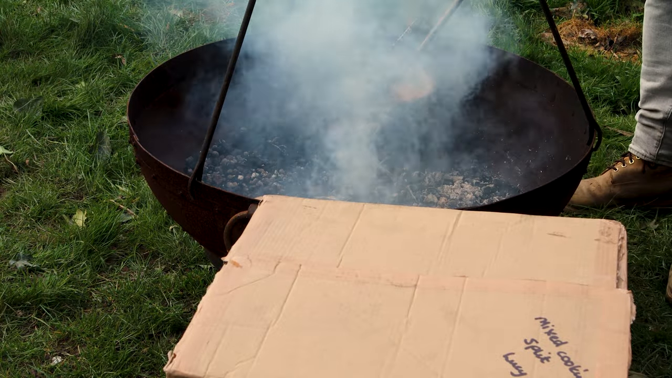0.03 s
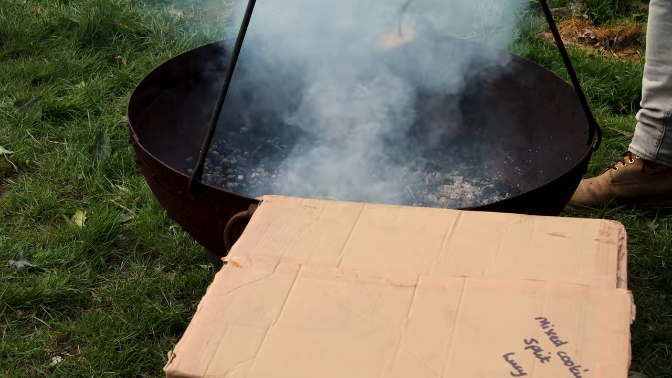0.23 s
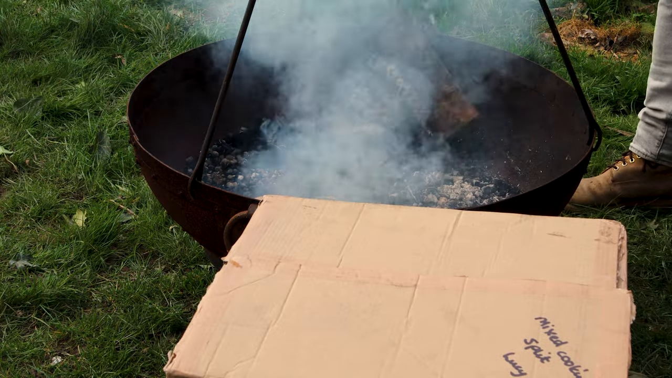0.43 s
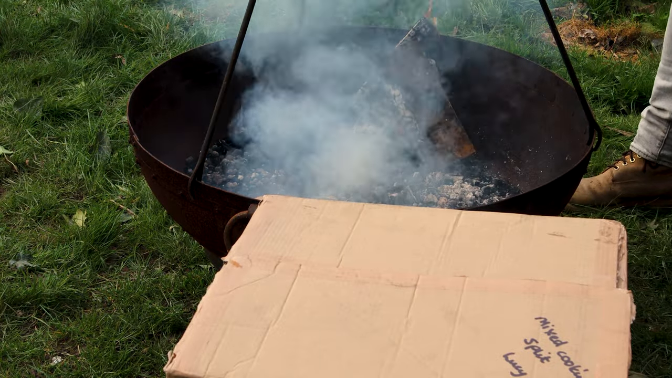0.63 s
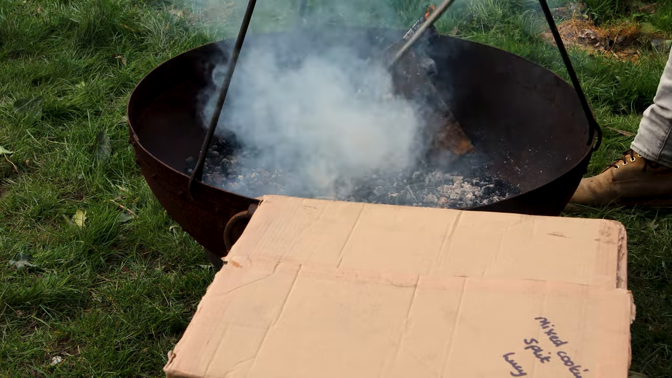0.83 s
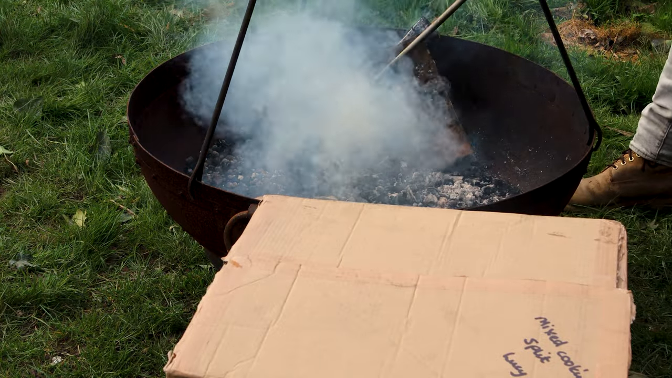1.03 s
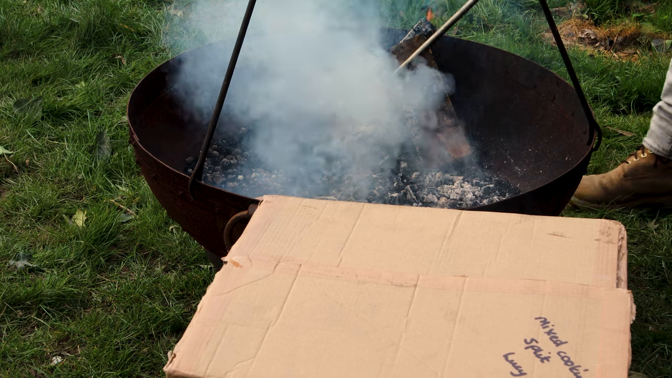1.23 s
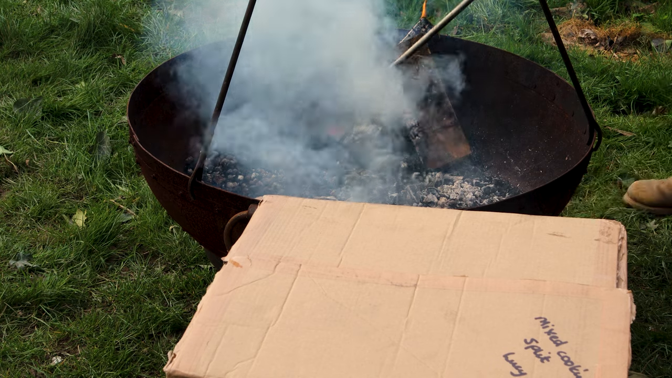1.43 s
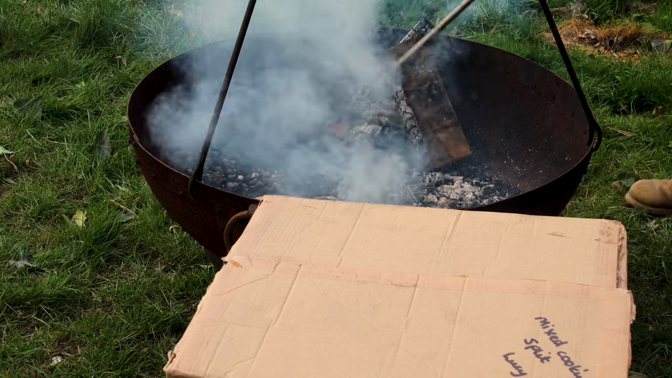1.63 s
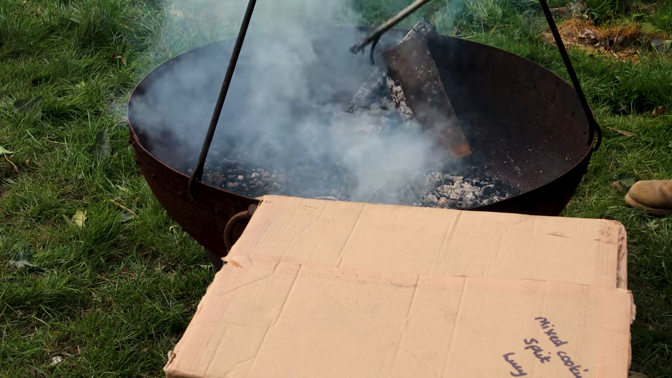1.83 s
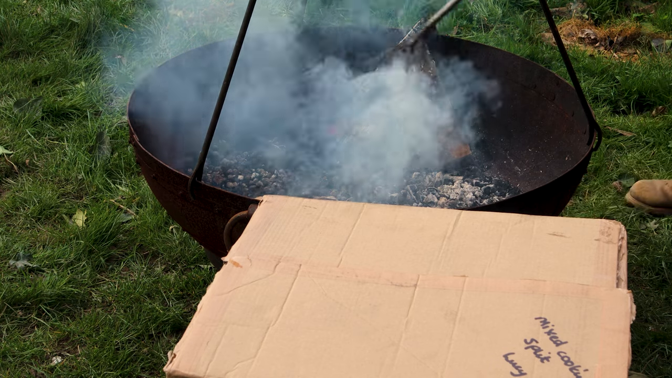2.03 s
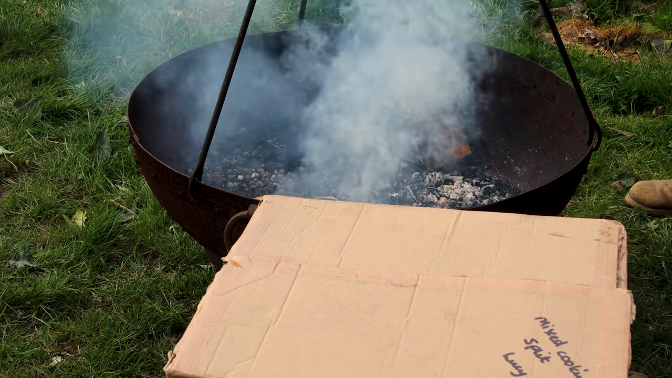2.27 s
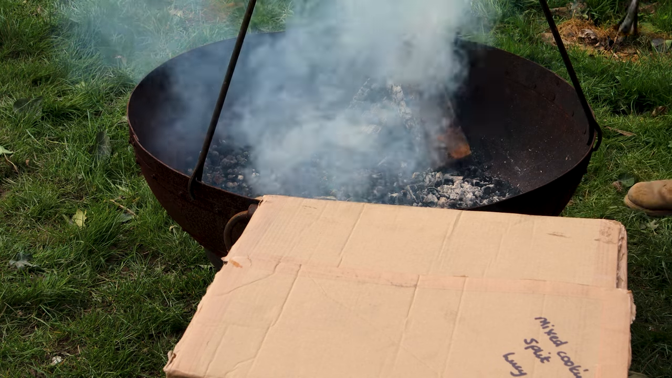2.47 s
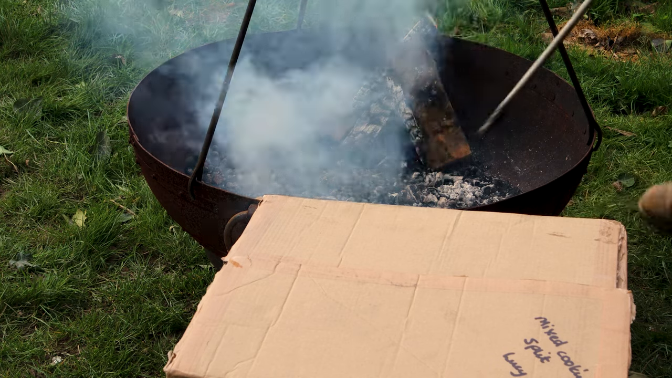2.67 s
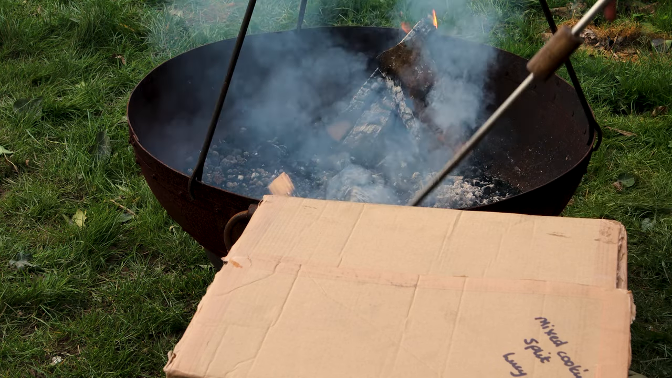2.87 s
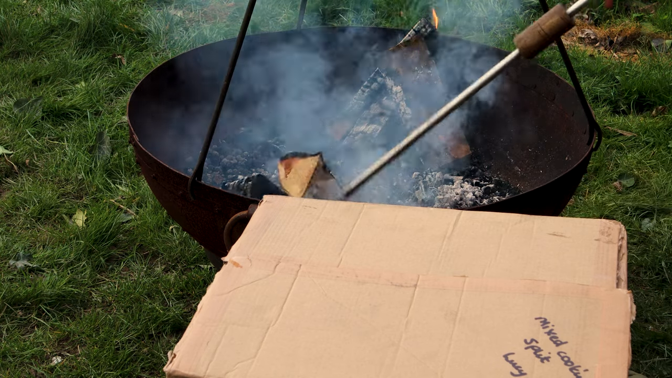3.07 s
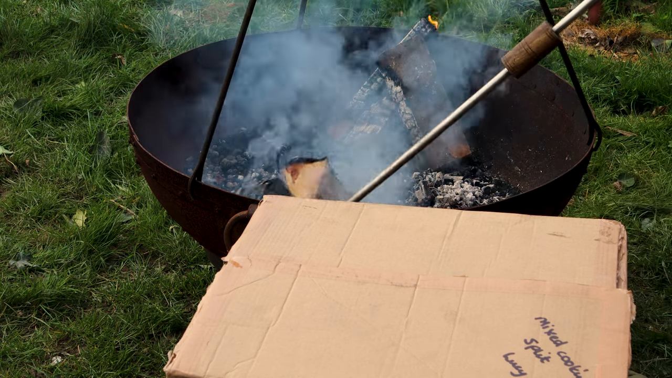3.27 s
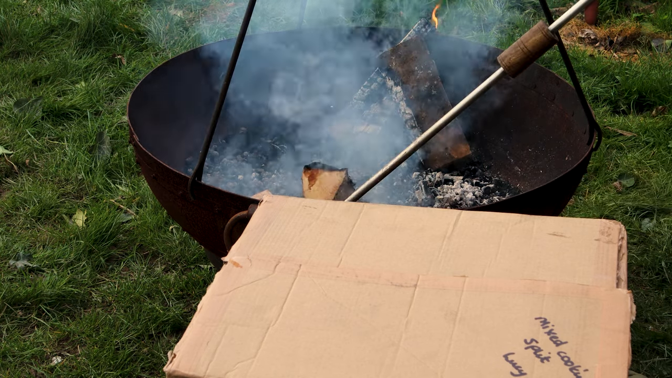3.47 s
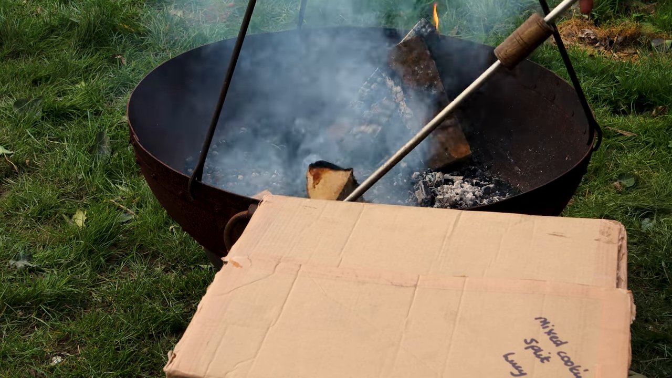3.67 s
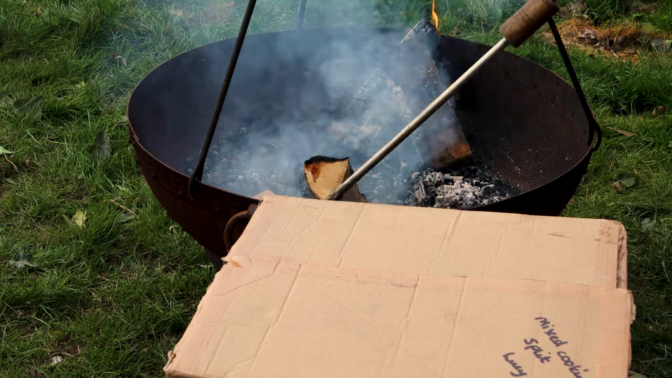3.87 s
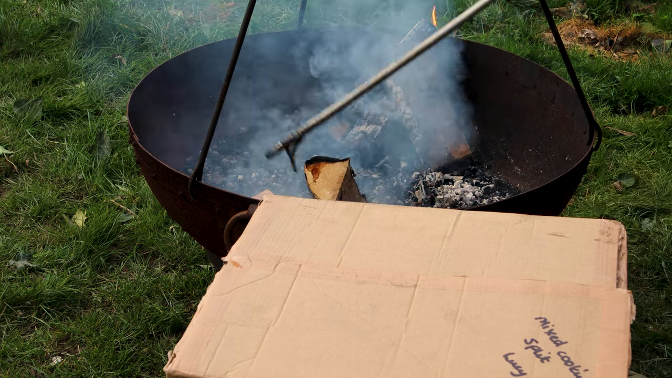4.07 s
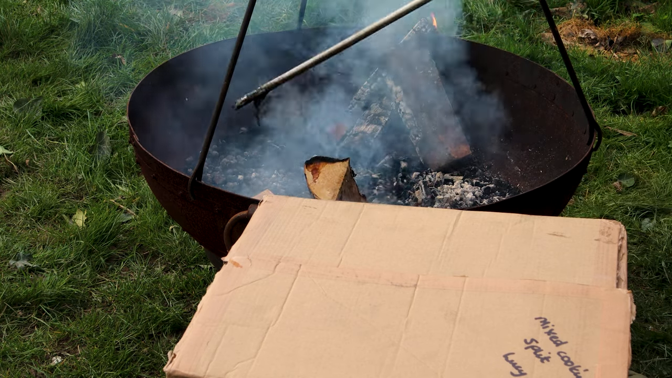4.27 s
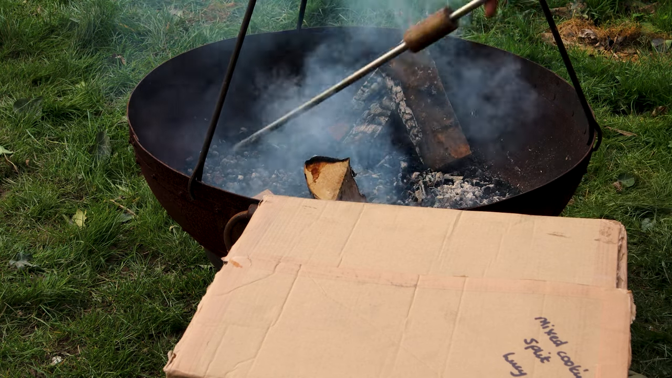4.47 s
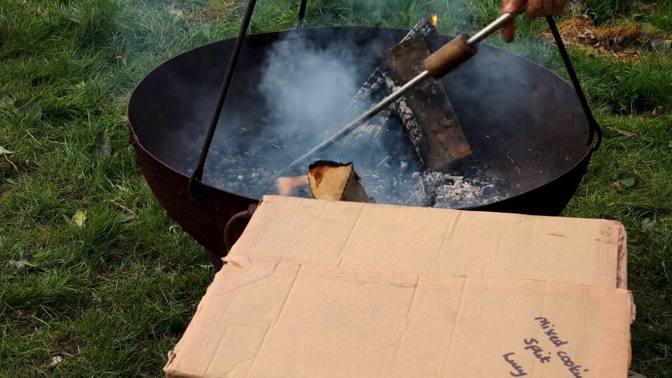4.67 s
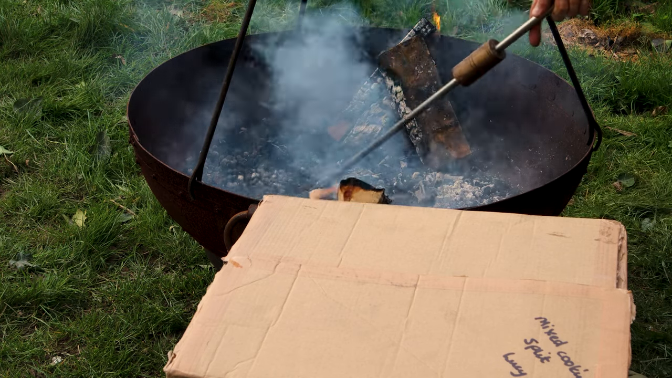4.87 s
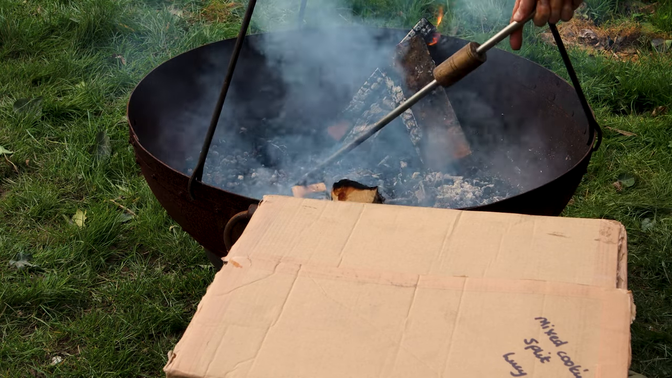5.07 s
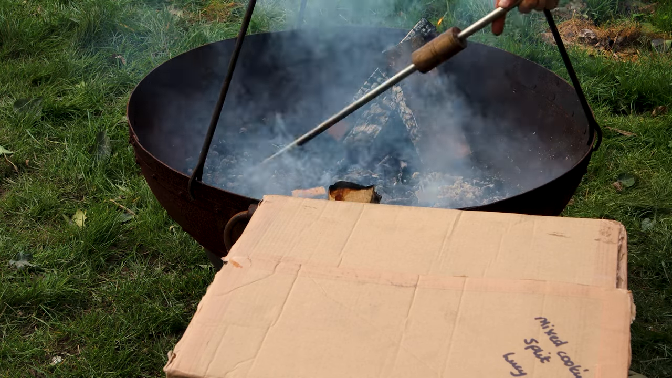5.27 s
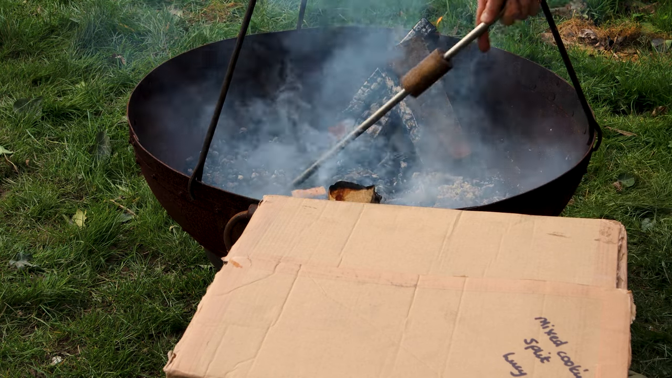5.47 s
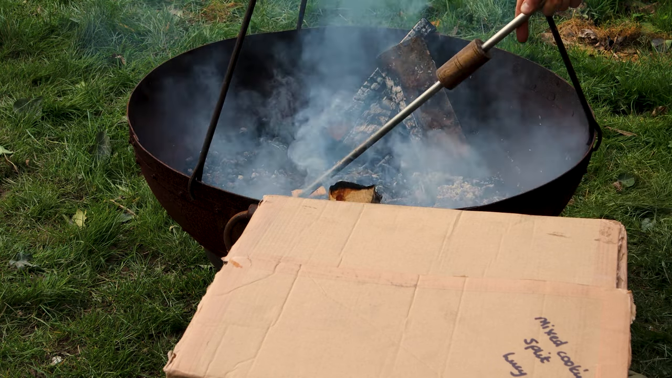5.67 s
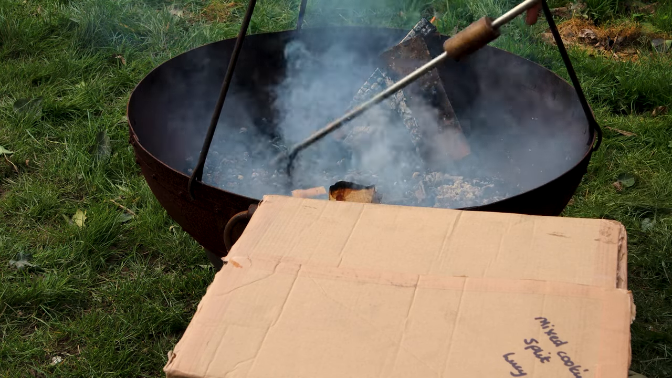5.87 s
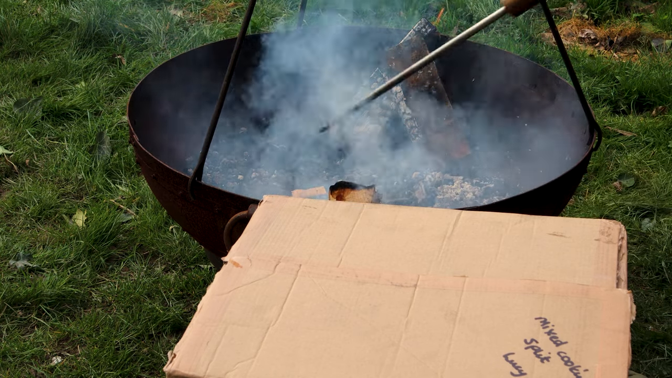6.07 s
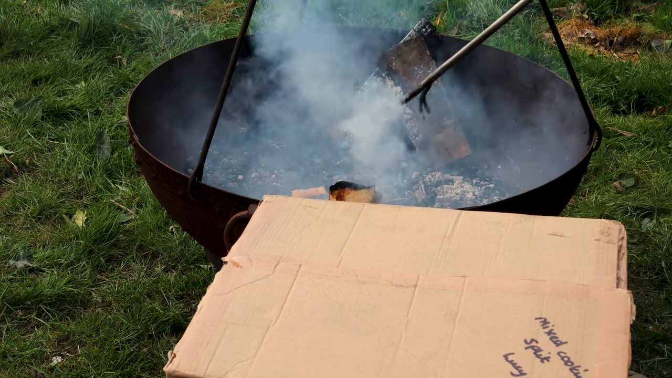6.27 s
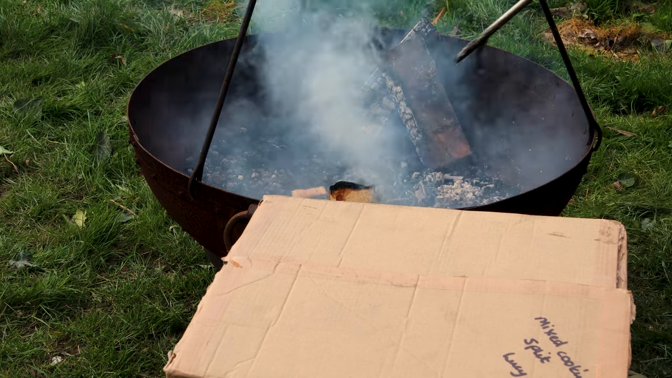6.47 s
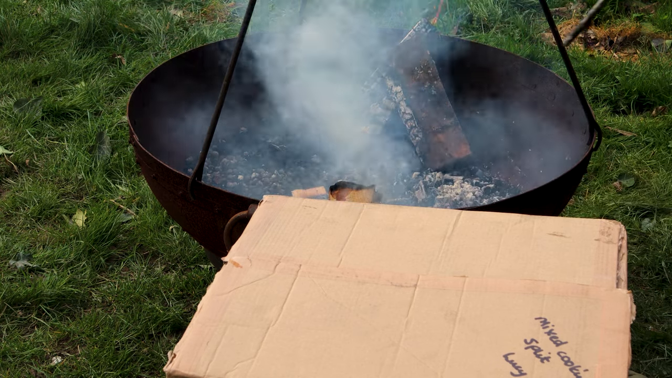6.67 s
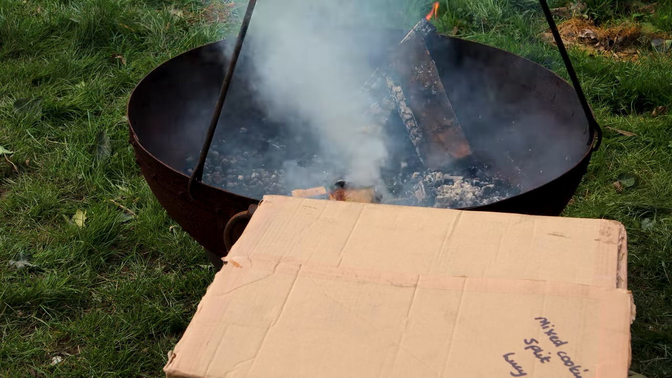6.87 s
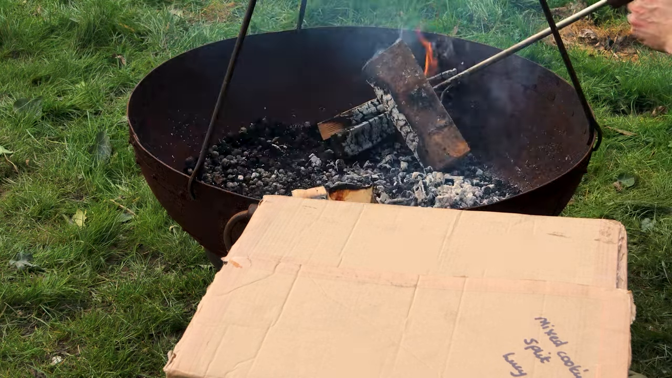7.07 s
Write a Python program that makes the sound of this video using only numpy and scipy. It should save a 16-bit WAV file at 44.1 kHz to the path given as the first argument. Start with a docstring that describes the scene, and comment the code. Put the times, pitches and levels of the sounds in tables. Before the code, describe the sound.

Iron tongs clink and knock logs in a metal fire bowl outdoors, one log crashing down hard, embers scraping, fire popping, a small bird singing.

```python
"""Close beside a cast fire bowl on a lawn; trees and hedges give short echoes and the garden rumbles softly.
Iron tongs clang and shift the logs at once; at half a second a log drops and overloads the microphone.
Logs then knock and drag through embers until about 5.7 s: each force excites the ash-damped bowl's modes.
From 2.9 to 4.7 s a small bird sings a gliding two-note phrase four times in the trees.
Gas pops, ticks and steam hiss run throughout; the bird chips briefly at 7 s."""
import sys
import numpy as np
from scipy import signal
from scipy.fft import rfft, irfft
from scipy.io import wavfile
from scipy.ndimage import uniform_filter1d

SR = 44100
rng = np.random.default_rng(int(sys.argv[2]) if len(sys.argv) > 2 else 0)


def to_wav(sig):
    """Store sig (one row per channel, or 1-D mono) as 16-bit WAV at the path in sys.argv[1].

    Samples outside -1..1 are clipped; the rate is SR.
    """
    pcm = np.clip(np.atleast_2d(sig), -1, 1) * 32767
    pcm = np.round(pcm).astype(np.int16)
    wavfile.write(sys.argv[1], SR, pcm.T)  # frames by channels


N = 313551
TIME = np.arange(N) / SR
AGE = TIME[:SR // 2]  # seconds since a short sound began
TOP_HZ = 15900  # the microphone's upper limit


def undb(db):
    """Decibels to gain."""
    return 10 ** (np.asarray(db) / 20)


def unit(x):
    """Scale to an rms of 1."""
    return x / np.sqrt(np.mean(x ** 2))


def peak(x, db):
    """Scale a short sound to this peak level."""
    return x * undb(db) / np.abs(x).max()


def burst(x, db, size=353):
    """Scale a short sound so that its loudest stretch of size samples has this rms level."""
    return x * undb(db) / np.sqrt(uniform_filter1d(x ** 2, size).max())


def add(out, start_s, x):
    """Mix x into out from start_s."""
    i = max(int(start_s * SR), 0)
    out[i:i + len(x)] += x[:len(out) - i]


def through(x, response):
    """Pass x through an impulse response."""
    return signal.fftconvolve(x, response)[:len(x)]


def colour(x, points, size=2048):
    """Causal minimum-phase filter with a (pitch_hz, level_db) spectrum."""
    hz, db = np.transpose(points)
    bins = np.maximum(np.fft.rfftfreq(size, 1 / SR), 1)
    gain = undb(np.interp(np.log(bins), np.log(hz), db))
    cepstrum = irfft(np.log(gain))
    # folding the cepstrum forward makes the filter causal
    cepstrum[1:size // 2] *= 2
    cepstrum[size // 2:] = 0
    return through(x, irfft(np.exp(rfft(cepstrum))))


def fade(t60):
    """Exponential decay by 60 dB in t60 seconds."""
    return np.exp(-np.log(1000) * AGE / max(t60, 1e-4))


def mode(hz, t60):
    """One struck resonance: a decaying sine."""
    return np.sin(2 * np.pi * hz * AGE) * fade(t60)


def grains(count, rate, spread_db):
    """Random tiny fractures, rate a second, a few much larger than the rest."""
    chance = rng.random(count) < rate / SR
    size = undb(spread_db * np.minimum(rng.exponential(size=count), 4))
    return unit(chance * size * rng.choice([-1, 1], count))


def walk(rate):
    """Random wander with a spread near 1, in straight lines between rate knots a second."""
    knots = rng.standard_normal(1024)
    return np.interp(TIME * rate, np.arange(len(knots)), knots)


def contact(crush_s, firm):
    """Force of a blow: one firm push, then charcoal crushing under it."""
    crush_s = max(crush_s, 5e-4)
    rise = 1 - np.exp(-AGE / .0012)
    force = grains(len(AGE), rate=8800, spread_db=3) * np.exp(-AGE / crush_s) * rise
    force /= np.linalg.norm(force)
    force[0] += firm
    return force


def ringing(modes, hold, wash_db, wash_t60):
    """Response of a body: its modes (hold scales their decay) and a wash of echoes inside the bowl."""
    tones = sum(rng.choice([-1, 1]) * undb(db) * mode(hz, t60 * hold) for hz, db, t60 in modes)
    wash = unit(rng.standard_normal(len(AGE)) * fade(wash_t60))
    return unit(tones) + undb(wash_db) * wash


def outdoors(x, db, t60):
    """Scattered echoes from trees and hedges, whose leaves soak up the treble."""
    age = TIME[:SR]
    decay = np.exp(-np.log(1000) * age / t60)
    build_up = 1 - np.exp(-age / .02)
    tail = rng.standard_normal(SR) * decay * build_up
    tail = colour(tail / np.linalg.norm(tail), [(5000, 0), (7500, -5), (16000, -14)])
    return x + undb(db) * through(x, tail)


# spectrum of the distant garden air: pitch_hz, level_db
GARDEN_AIR = [(15, -39.5), (25, -16), (117, 4), (195, 3), (405, -13), (516, -2.5), (775, -11),
              (1040, -10.5), (1790, -21), (3720, -27.5), (6560, -32.5), (14400, -28), (16000, -32.5)]


def garden():
    """Soft distant rumble and air: two coloured noises whose levels wander."""
    air = unit(colour(rng.standard_normal(N), GARDEN_AIR))
    breeze = unit(colour(rng.standard_normal(N), [
        (20, -7.5), (60, -3.5), (130, 2.0), (280, -4.0), (600, -21.5), (1500, -34.5), (5000, -63.5)]))
    return air * undb(-63 + walk(18)) + breeze * undb(-62.5 + 5.2 * walk(10))


def sing(shape, notes):
    """Play one gliding note shape at each time; fast random flutter of the pitch makes it buzz."""
    out = np.zeros(N)
    t, hz, db, flutter_hz = np.transpose(shape)
    edges = np.clip(np.minimum(AGE, t[-1] - AGE) / 0.0036, 0, 1)
    loudness = undb(np.interp(AGE, t, db)) * edges
    for start_s, note_db, ratio in notes:
        flutter = np.interp(AGE, t, flutter_hz) * walk(3500)[:len(AGE)]
        pitch_hz = ratio * np.interp(AGE, t, hz) + flutter
        add(out, start_s, undb(note_db) * loudness * np.sin(2 * np.pi * np.cumsum(pitch_hz) / SR))
    return out


# rising note, falling note and chip: time_in_note_s, pitch_hz (before any ratio), level_db, flutter_hz
WHISTLE = [(0, 4354, -6, 20), (.015, 4770, -10, 130), (0.051, 4937, -1, 51), (0.084, 4990, -6.5, 30.5),
           (.115, 4938, -1.5, 32), (.145, 4780, -11, 7.88)]
SLUR = [(0, 8200, -18, 600), (.015, 7600, -4, 550), (.03, 7250, -3, 550), (.037, 5400, -14, 600),
        (.05, 4300, -4, 150), (.07, 3900, 0, 30), (.1, 3740, 0, 15), (.125, 3710, -14, 0)]
CHIP = [(0, 3700, -17.5, -4.5), (.004, 3940, 5.5, -9), (.009, 4320, -2, 19), (.022, 4180, 6, 14),
        (.036, 4270, -5, 21), (.044, 4310, -31, 7)]
# the bird's phrases: start_s, whistle_db, whistle_pitch_ratio, slur_db
PHRASES = [(2.94, -45, .975, -44), (3.442, -44, .995, -51), (3.945, -42, .975, -45), (4.443, -41, 1.0, -49)]
# chips near the end: start_s, level_db, pitch_ratio
CHIPS = [(7.007, -51, 1.1), (7.011, -58.5, 0.81), (7.046, -36.5, 1.004), (7.091, -58, 1.14)]
SLUR_AFTER_S = .204


def birds():
    """A rising whistle answered by a falling slur that lingers in the trees, then a few chips."""
    whistles = sing(WHISTLE, [(s, db, ratio) for s, db, ratio, _ in PHRASES])
    slurs = sing(SLUR, [(s + SLUR_AFTER_S, db, 1) for s, _, _, db in PHRASES])
    song = outdoors(whistles, db=-6, t60=.4) + outdoors(slurs, db=-3, t60=.8)
    return song + outdoors(sing(CHIP, CHIPS), db=-7.5, t60=0.53)


# faint pops are scattered around a typical level and pitch
SMALL_POP_COUNT = 20
SMALL_POP_DB, SMALL_POP_SPREAD_DB = -47, 1.5
SMALL_POP_HZ, SMALL_POP_SPREAD_OCTAVES = 4600, .4


def small_pops():
    """Faint pops at random moments: rows of start_s, level_db, pitch_hz."""
    times = rng.uniform(0, N / SR, SMALL_POP_COUNT)
    strength, pitch = rng.standard_normal((SMALL_POP_COUNT, 2)).T
    hz = np.minimum(SMALL_POP_HZ * 2 ** (SMALL_POP_SPREAD_OCTAVES * pitch), TOP_HZ)
    return list(zip(times, SMALL_POP_DB + SMALL_POP_SPREAD_DB * strength, hz))


def bowl_echo(x, lag_s=0.01, db=-11):
    """The curved wall throws a pop back once, amid a short scatter."""
    response = undb(-36.0) * rng.standard_normal(len(AGE)) * fade(0.011)
    response[0] += 1
    add(response, lag_s, undb(db) * np.ones(1))
    return through(x, response)


# the fire's loudest pops: start_s, level_db, pitch_hz
LOUD_POPS = [(0.728, -20.5, 3980), (0.869, -36, 7450), (0.92, -25.5, 870), (0.814, -34.5, 10800),
             (0.923, -24.5, 7700), (1.059, -31, 3460), (1.293, -40.5, 3780), (1.508, -38, 2560),
             (1.821, -33, 1000), (1.845, -27.5, 3570), (2.145, -36, 3970), (2.333, -41, 4860),
             (2.459, -38.5, 2990), (2.5, -40, 497), (2.818, -37, 2950), (3.246, -30, 3660),
             (4.508, -34, 4910), (5.069, -33.5, 9200), (5.161, -30, 3360), (5.412, -22, 3950),
             (6.072, -32, 4760), (6.37, -24, 3290), (6.487, -23, 11300), (6.569, -32, 3423),
             (6.871, -31, 3170)]
# steam from the hot wood, which also drives the patter: time_s, level_db (the hiss wanders around it)
STEAM = [(0, -63.5), (1.45, -63.5), (1.7, -70.5), (2.7, -67), (5.3, -75.5), (6.2, -67.5), (6.7, -64.5),
         (7.1, -65)]
# spectrum of fizzing gas and crushed charcoal: pitch_hz, level_db
GRIT = [(300, -40), (2000, -15), (4000, -3), (6000, -1), (8500, 0), (11000, -6), (16000, -12)]
FIZZ_DB = -20  # escaping gas, relative to its pop
TICKS_DB = -4  # the patter, relative to the steam


def fire():
    """Gas pockets burst in the wood: clear pops, a patter of tiny ticks and a thin steam hiss."""
    pops = np.zeros(N)
    for start_s, db, hz in LOUD_POPS + small_pops():
        snap = mode(hz, 0.0014 + 3 / hz)  # small cavities ring high and briefly
        fizz = colour(contact(crush_s=0.0009, firm=0.33), GRIT)
        add(pops, start_s, peak(snap, db) + burst(fizz, db + FIZZ_DB, size=88))
    steam_db = np.interp(TIME, *np.transpose(STEAM))
    patter = unit(colour(grains(N, rate=150, spread_db=5), [
        (500, -30), (2500, -9.5), (5000, -8), (9000, 3.5), (16000, -5.5)]))
    ticks = undb(steam_db + TICKS_DB) * patter
    hiss = unit(colour(rng.standard_normal(N), [
        (300, -14), (1200, -3), (2600, -2), (3900, 0), (5200, -8), (9000, -15), (16000, -24)]))
    return bowl_echo(pops + ticks) + hiss * undb(steam_db + walk(2.0))


# cinders giving way: start_s, length_s, hiss_db, rasp_db
SPILLS = [(0.383, .013, -33.5, -38), (0.468, 0.028, -43, -45), (0.721, 0.032, -47, -48.5),
          (1.003, 0.021, -48.5, -52.5), (1.078, 0.012, -36.5, -35), (2.88, 0.039, -39, -33),
          (2.955, 0.043, -37, -43.5), (3.691, 0.086, -48.5, -45.5), (4.0, 0.069, -45.5, -64),
          (4.073, 0.0075, -41, -42.5), (4.901, .1, -44, -37.5), (5.412, 0.036, -66, -40),
          (5.512, 0.029, -52, -49), (5.672, 0.033, -56, -50), (6.687, 0.032, -80, -55.5)]
# the bowl's modes: pitch_hz, relative level_db, t60_s (each contact's hold scales it)
BOWL = [(183, -14, .16), (312, -12, .14), (365, -8, .13), (398, -4, .2), (585, -3, .15), (690, -7, .1),
        (775, -8, .1), (969, -11, .1), (1163, -17, .12), (1410, 0, .09), (1535, -2, .1), (1650, -4, .14),
        (1790, -7, .11), (1857, 0, .11), (1952, 0, .11), (2065, -3, .1), (2153, -8, .12), (2471, -7, .13),
        (2611, -3, .12), (2824, -3, .11), (2995, -3, .08), (3192, -7, .09), (3340, -9, .09),
        (3640, -7, .11), (3801, -2, .09), (3905, -5, .09), (4226, -14, .1), (4470, -13, .08),
        (5385, -22, .08)]


def spills():
    """Little slides of brittle cinders swell and stop, pattering on the iron."""
    out = np.zeros(N)
    for start_s, length_s, hiss_db, rasp_db in SPILLS:
        swell = np.sqrt(np.maximum(AGE * (length_s - AGE), 0))
        shower = grains(len(AGE), rate=21000, spread_db=10.0) * swell
        on_iron = through(shower, ringing(BOWL, hold=0.2, wash_db=14, wash_t60=0.009))
        rasp = colour(on_iron, [
            (300, -13.5), (1300, -13), (3200, 3), (4200, -0.5), (6000, -13), (16000, -31.0)])
        hiss = colour(shower, [(1000, -31), (4000, -12), (9000, 1.0), (12000, -5.0), (16000, -4)])
        add(out, start_s, burst(hiss, hiss_db) + burst(rasp, rasp_db))
    return out


def sliding(force, modes, hold, wash_db, wash_t60, rate=9, count=3):
    """The contact wanders between places on the bowl, each of which rings in its own way."""
    shares = np.array([walk(rate) for _ in range(count)])
    shares /= np.linalg.norm(shares, axis=0)
    return unit(sum(through(force * share, ringing(modes, hold, wash_db, wash_t60)) for share in shares))


# strokes through the embers: start_s, hold_s, iron_rasp_db, log_rumble_db, release_db_per_s
STROKES = [(0.0, 0.0056, -51, -69, 168), (0.135, 0.018, -66, -52.5, 173), (0.371, 0.26, -53.5, -48.5, 63.5),
           (0.977, .17, -59, -52.5, 57), (2.053, 0.097, -72, -67.5, 197), (2.98, 0.12, -45, -56, 196),
           (3.316, .2, -50, -54, 178), (3.687, 0.093, -53, -59, 198), (3.817, 0.17, -38.5, -35, 176),
           (4.615, 0.21, -54, -70, 83), (4.788, 0.18, -46.5, -48, 170), (5.04, 0.17, -59.5, -67.5, 250),
           (5.455, 0.025, -57.5, -48, 210), (5.522, 0.06, -47.5, -52, 164.5)]
# modes of a log pressed on the iron as it slides: pitch_hz, relative level_db, t60_s (before hold scales it)
PRESSED_LOG = [(171, -19.5, 0.3), (340, 0, .1), (403, 2.5, 0.13), (585.7, 2.5, 0.24), (710, 2.5, 0.041),
               (780, -4, 0.16), (977, 1, 0.12), (1406, -5, .12), (1675, 16, 0.014), (1730, 3, .14),
               (2000, 4, 0.017), (2230, -4, 0.034), (2240, -8, 0.13), (2476, 2.5, 0.15), (3150, -18, .07),
               (2960, -7, 0.075), (3330, -5, 0.097), (3600, 5, 0.046), (3480, -4, 0.043), (4150, -9, 0.027)]
STROKE_ATTACK_DB_PER_S = 330.5
# ash hiss relative to the rasp: it grows as ash heaps up ahead of the log
ASH_DB, ASH_BUILD_DB_PER_S = -17, 48.5


def dragging():
    """Stick and slip: fractures rattle in the bowl, ash hisses; each stroke swells, holds and dies away."""
    out = np.zeros(N)
    slips = grains(N, rate=2600, spread_db=5.0) * undb(1.7 * walk(50))
    pressed = unit(through(slips, ringing(PRESSED_LOG, hold=.7, wash_db=-7, wash_t60=.05)))
    loose = sliding(slips, BOWL, hold=.5, wash_db=10.5, wash_t60=.012)
    fractures = grains(N, rate=6000, spread_db=4.0) * undb(2.4 * walk(76))
    cinders = unit(colour(fractures, GRIT))
    for start_s, hold_s, rasp_db, rumble_db, release_db_per_s in STROKES:
        age = TIME - start_s
        attack_db = STROKE_ATTACK_DB_PER_S * np.minimum(age, 0)
        release_db = release_db_per_s * np.maximum(age - hold_s, 0)
        effort = undb(attack_db - release_db)
        hiss_db = rasp_db + ASH_DB + ASH_BUILD_DB_PER_S * np.clip(age, 0, hold_s)
        # only a hard-pressed log sings against the iron
        pressure = np.interp(rumble_db, [-48, -40], [0, 1])
        body = np.sqrt(pressure) * pressed + np.sqrt(1 - pressure) * loose
        rumble = unit(colour(body, [(60, -16.5), (180, 4.0), (1000, -4.5), (1500, -20.0), (4000, -51.5)]))
        rasp = unit(colour(body, [
            (300, -32.5), (900, -15), (1450, 3), (4000, 6.5), (5200, -6.5), (8000, -16.0), (16000, -32.5)]))
        out += effort * (rumble * undb(rumble_db) + rasp * undb(rasp_db) + cinders * undb(hiss_db))
    return out


# dull knocks on wood: start_s, thud_db, crack_db, log_pitch_hz, ring_t60_s
KNOCKS = [(0.113, -26, -42, 220, 0.065), (0.389, -28.5, -38, 408, .06), (0.919, -28, -39, 553, 0.025),
          (1.673, -27, -36, 614, 0.031), (3.431, -29, -42.5, 564, 0.096), (4.603, -31, -28.5, 346, 0.026),
          (4.827, -16.5, -37, 255.4, 0.052)]
# spectra of the log's thud and of the ringing iron: pitch_hz, level_db
THUD = [(40, -33), (130, -19.5), (220, 1), (400, 0.5), (620, -4), (850, -12), (1100, -13.5), (2000, -45),
        (5000, -78.5)]
RING = [(200, -53), (800, -25.5), (1400, 0.5), (2000, 1.5), (3000, 2.5), (3900, -0.5), (4800, -10),
        (7000, -20.5), (16000, -58)]
KNOCK_GRIT_DB = -13  # relative to the crack


def knocks():
    """A log's bending mode dies fast, with little sound below its pitch; the bowl answers faintly."""
    out = np.zeros(N)
    for start_s, thud_db, crack_db, hz, t60 in KNOCKS:
        force = contact(crush_s=t60 / 9, firm=0.92)
        body = through(force, ringing(BOWL, hold=0.057, wash_db=11.0, wash_t60=0.026))
        wood = unit(mode(hz, t60)) + undb(-5.0) * unit(colour(body, THUD))
        low_cut = signal.butter(3, 0.37 * hz, "highpass", fs=SR, output="sos")
        thud = burst(signal.sosfilt(low_cut, wood), thud_db, size=176)
        crack = burst(colour(body, RING), crack_db)
        grit = burst(colour(force, GRIT), crack_db + KNOCK_GRIT_DB)
        add(out, start_s, thud + crack + grit)
    return out


# tongs and logs striking the bowl: start_s, ring_db, thud_db, tongs_pitch_hz, crush_s
CLANGS = [(0.0731, -31.5, -69, 3214, 0.011), (0.2554, -38.5, -50.5, 2600, 0.03),
          (0.3812, -31.5, -35, 4090, 0.027), (0.5777, -14.5, -36.5, 2555, 0.0067),
          (0.5858, -13.5, -34.5, 1773, 0.0043), (1.0795, -35.5, -36, 3030, 0.016),
          (1.133, -31, -42.5, 1620, 0.0038), (2.8501, -20.5, -39.5, 1440, 0.012),
          (2.8842, -28, -38.5, 1490, 0.017), (2.9034, -36, -65, 3280, 0.015),
          (3.282, -26.5, -44, 3750, 0.0062), (3.3359, -35, -37.5, 3430, 0.0073),
          (3.8051, -15.5, -32, 2660, 0.0028), (3.967, -23, -52, 2020, 0.011),
          (3.9805, -23, -65, 2070, 0.0038), (4.0734, -36, -44, 4960, 0.0041),
          (4.833, -19, -18.5, 1770, 0.0047), (4.842, -18.5, -21.5, 1506, 0.02),
          (4.999, -38, -63, 1460, 0.0036), (5.4089, -30.5, -52, 3440, 0.0015),
          (5.5486, -33.5, -45, 3580, 0.01), (5.6016, -23.5, -46, 2957, 0.006)]
# charcoal crushed by a middling blow; harder blows crush more (dB of grit per dB of ring)
MIDDLING_RING_DB, CLANG_GRIT_DB, GRIT_PER_RING = -27, -44.5, 0.25


def clangs():
    """Each contact thuds through the log, rings the iron and crushes some charcoal."""
    out = np.zeros(N)
    for start_s, ring_db, thud_db, tongs_hz, crush_s in CLANGS:
        grit_db = CLANG_GRIT_DB + GRIT_PER_RING * (ring_db - MIDDLING_RING_DB)
        force = contact(crush_s, firm=0.39)
        body = through(force, ringing(BOWL, hold=0.33, wash_db=6.5, wash_t60=0.066))
        clink = through(force, mode(tongs_hz, 0.053))  # the note depends on where the tongs are gripped
        iron = unit(colour(body, RING)) + undb(0.5) * unit(clink)
        thud = burst(colour(body, THUD), thud_db)
        grit = burst(colour(force, GRIT), grit_db)
        add(out, start_s, peak(iron, ring_db) + thud + grit)
    return out


# spectrum of the charcoal crash under the dropped log: pitch_hz, level_db
CRASH = [(53, -48.5), (90, -17), (338, -5), (393, -10), (593, -7), (1070, -16.5), (1380, -10.5), (1910, -8),
         (3740, -9), (4750, -20), (8350, -23.5), (16000, -48)]
# how the ash-lined bowl radiates under a heavy blow: pitch_hz, level_db
HEAVY_RING = [(100, -7), (300, -0.5), (1000, -1), (1900, 1.5), (4000, -2), (5000, -12), (8000, -20.5),
              (16000, -42)]


def dropped_log(ring_db=-5, crash_db=-4.0, grit_db=-27, thump_db=-22, thump_hz=85, thump_t60=0.11):
    """A log falls onto the iron: a short crash of charcoal, the whole bowl rings and thumps on its stand."""
    blow = contact(crush_s=.007, firm=1.6)
    crush = contact(crush_s=.0075, firm=0)
    body = through(blow, ringing(BOWL, hold=1.0, wash_db=1.5, wash_t60=0.12))
    ring = burst(colour(body, HEAVY_RING), ring_db)
    crash = burst(colour(crush, CRASH), crash_db) + burst(colour(crush, GRIT), grit_db)
    thump = burst(mode(thump_hz, thump_t60), thump_db)
    out = np.zeros(N)
    add(out, .498, ring + crash + thump)
    return out


def scene():
    """The fire bowl close by, the garden behind it."""
    close = dropped_log() + clangs() + knocks() + dragging() + spills() + fire()
    return (outdoors(close, db=-12, t60=0.077) + birds() + garden())[None]


def record(dry):
    """Overload pushes the microphone's bias aside, which swings back slowly; peaks clip and the top is cut."""
    overload = np.clip(np.abs(dry) - .55, 0, .5)
    bias_swing = signal.butter(1, [2.3, 14], "bandpass", fs=SR, output="sos")
    bias = signal.sosfilt(bias_swing, overload)
    clipped = np.clip(dry - 3.2 * bias, -.97, .97)
    top_cut = signal.ellip(8, .2, 70, TOP_HZ, fs=SR, output="sos")
    return signal.sosfilt(top_cut, clipped)


dry = scene()
out = record(dry)
to_wav(out)
```